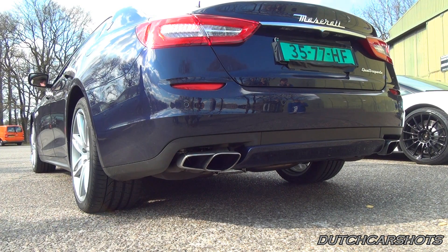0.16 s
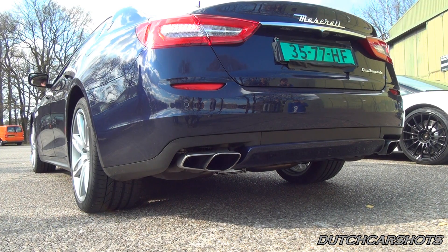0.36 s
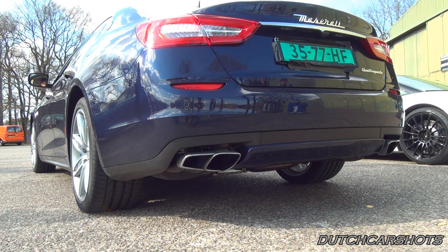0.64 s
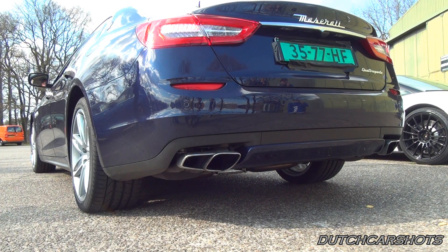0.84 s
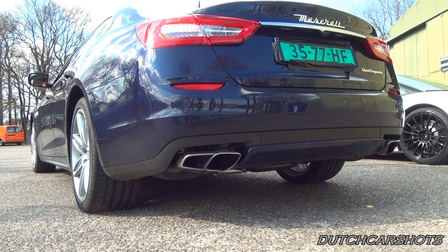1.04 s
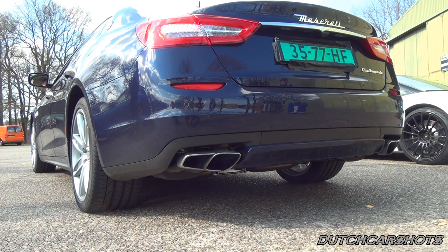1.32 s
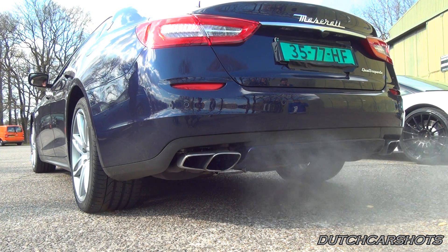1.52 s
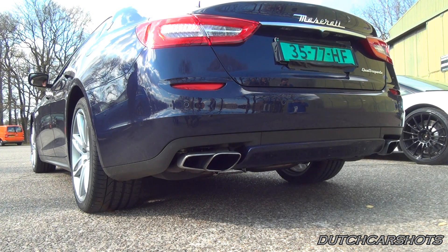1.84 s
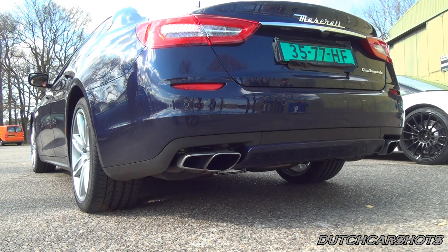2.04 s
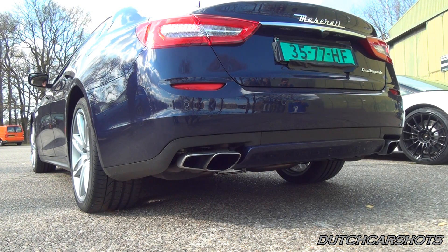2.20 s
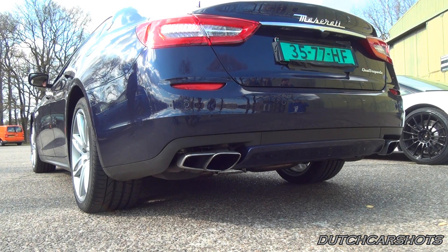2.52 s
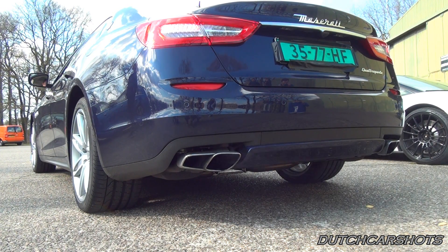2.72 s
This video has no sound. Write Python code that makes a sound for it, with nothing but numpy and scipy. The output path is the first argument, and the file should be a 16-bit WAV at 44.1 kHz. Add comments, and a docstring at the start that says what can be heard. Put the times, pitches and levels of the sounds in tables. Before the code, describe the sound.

Close, dry, nearly centred exhaust sound on an open paved lot: a hollow coasting drone drops, surges into a crackling bark, pops sharply at the peak, coasts down quieter, then snarls upward again, cut off while rising.

```python
"""Twin-turbo V8 blips on a paved lot

Microphones close behind the tailpipes of a coasting engine; it is blipped twice, the second blip still open at the end.
Uneven firings ring the exhaust; each also gives a shock, making a rasp that is loudest under load; gas and turbos hiss.
At the top of the first rev the throttle shuts and fuel pops in the pipes as bursts of noise that ring the tips.
The lot adds a faint decaying echo, and a fast limiter holds the peaks."""
import sys
import numpy as np
from scipy import signal
from scipy.fft import rfft, irfft, next_fast_len
from scipy.io import wavfile
from scipy.ndimage import uniform_filter1d

SR = 44100
rng = np.random.default_rng(int(sys.argv[2]) if len(sys.argv) > 2 else 0)


def log_audio(samples):
    """Write samples as a 16-bit WAV file to the path given in sys.argv[1]."""
    # one column per channel
    frames = np.atleast_2d(samples).T
    # limit to full scale, then quantise
    limited = np.clip(frames, -1, 1)
    pcm = np.round(limited * 32767).astype(np.int16)
    wavfile.write(sys.argv[1], SR, pcm)


N = 126126

# engine speed: time_s, firing_rate_hz
ENGINE_SPEED = [(0.0, 300.9), (0.15, 271.6), (0.45, 222.3), (0.65, 194.2), (0.92, 155.8), (1.1, 161.7),
                (1.17, 170.4), (1.3, 216.7), (1.41, 273.5), (1.58, 347.1), (1.63, 342.5), (1.78, 315),
                (1.95, 285.8), (2.1, 259.8), (2.27, 233.8), (2.42, 209.4), (2.5, 203.5), (2.6, 226.2),
                (2.7, 269), (2.86, 342.4)]
# exhaust note before its brief sags: time_s, level_db
NOTE_LEVEL = [(0, -15), (.28, -17.5), (.45, -14), (.65, -15), (.83, -18), (.9, -16.5), (1.0, -14),
              (1.04, -10), (1.3, -9), (1.57, -10.5), (1.62, -12.5), (1.68, -12.5), (1.72, -16.5),
              (1.77, -14), (1.93, -19.5), (2.0, -18.5), (2.27, -19.5), (2.33, -16), (2.44, -18),
              (2.48, -12.5), (2.86, -10)]
# rasp of the firing shocks: time_s, level_db
RASP_LEVEL = [(0, -32), (.35, -34.5), (.55, -38.5), (.87, -39), (1.0, -31), (1.15, -22), (1.33, -24),
              (1.5, -22.5), (1.57, -22.5), (1.68, -32), (1.78, -29), (1.88, -35.5), (2.2, -37),
              (2.43, -41.5), (2.48, -37), (2.65, -25), (2.86, -22.5)]
# gas hiss at the tips before its flutter: time_s, level_db
HISS_LEVEL = [(0, -31.5), (.4, -34.5), (.6, -39), (.85, -45), (1.0, -38), (1.15, -30.5), (1.55, -31),
              (1.8, -36), (2.15, -35.5), (2.4, -41), (2.55, -39.5), (2.7, -33), (2.86, -35)]
# turbo whoosh: time_s, centre_hz, level_db
TURBO_WHOOSH = [(0, 13000, -46), (.3, 10500, -50), (.65, 6900, -55), (1.03, 6400, -52), (1.3, 10500, -40.5),
                (1.45, 13000, -48), (1.8, 13000, -52), (2.15, 10200, -50), (2.5, 6800, -58),
                (2.68, 9000, -40), (2.86, 13000, -54)]
# throttle blips, timed at half opening: open_s, shut_s
THROTTLE_BLIPS = [(.93, 1.58), (2.462, 2.95)]
THROTTLE_RAMP_S = 0.11

# cylinders in firing order, relative levels:
# late_firing_intervals, coast_db, throttle_db, rasp_db
CYLINDER_FIRINGS = [(.78, -6, 0, -2), (0.97, -4, -2, -7), (0.893, -5, 1.5, -12.5), (0.768, -11, -6, -7.5),
                    (.82, -12, -3.5, -4.5), (0.804, -1.5, -0.5, -11.5), (0.86, -22.5, -2.5, -9),
                    (0.487, -8.5, -13, -5)]
# random spread from firing to firing
SCATTER_DB, JITTER_S, RASP_SCATTER_DB = 1.1, .00006, 2.2
# each cylinder's drift over a few cycles; its strength drifts half as much under throttle
DRIFT_DB, DRIFT_S = 2.0, .00011
# puffs of gas beside the pulses; the load level adds to the first under throttle
TURBULENCE_DB, LOAD_TURBULENCE_DB, PUFF_S = -10.5, -12, .002
# boom at the firing rate under throttle: firing_rate_hz, level_db
FIRING_BOOM = [(165, -25), (205, -30), (230, -17), (270, -15), (345, -45)]
COAST_DRONE_DB = -18
# share of full gas flow under throttle: firing_rate_hz, share
GAS_FLOW = [(170, 0), (260, 0.93)]
# exhaust colour, relative: frequency_hz, level_db
PIPE_COLOUR = [(30, -68), (100, -36), (150, -27.5), (230, -26), (300, -20.5), (360, -6.5), (480, -3.5),
               (560, -13), (720, -22.5), (900, -14.5), (1120, -37), (1600, -30), (3000, -69.5),
               (16000, -100)]
# exhaust resonances: pitch_hz, width_hz, low_flow_lift_db, full_flow_lift_db
PIPE_RESONANCES = [(153, 21, 9, -14), (271, 17.6, 9.5, 11), (344.7, 34.7, 11, 9), (391.7, 17, 7, 0.5),
                   (434, 37.7, 8, 10.5), (480.5, 29.7, 9, 9.5), (606, 21, 8.5, 3), (658, 34, 12, 3.5),
                   (730, 28, -1, 9), (787.3, 23.7, 11.5, 11.5), (832.8, 36, 15.5, 9), (886, 25, 2.5, 3),
                   (1013.6, 31, 13.5, 10.5)]
# wander of the resonances: spread as a share of pitch, length of each smoothing pass
WANDER_SHARE, WANDER_SMOOTH_S = .016, .09
# the note above this edge comes forward with throttle
BARK_HZ, BARK_COAST_DB, BARK_LOAD_DB = 530, 1, 8.5
# brief sags of the note: centre_s, length_s, level_db
NOTE_SAGS = [(1.013, .015, -1), (1.219, 0.012, -5.5), (1.668, 0.014, -4), (2.544, 0.015, -2.5)]

# colour of rasp and cracks, relative: frequency_hz, level_db
RASP_TONE = [(60, -72), (500, -13), (1150, -1.5), (1300, 1), (1450, 7), (1680, 3.5), (1900, 8.5),
             (2400, -0.5), (2800, -4), (3300, -9.5), (3800, -21.5), (4600, -17.5), (5600, -48),
             (15000, -50)]
# shock fronts coasting and under throttle, and steady noise under them
SHOCK_COAST_DB, SHOCK_LOAD_DB, RASP_BED_DB = -10, 0, -1.5
# sharp cracks at the tips: start_s, level_db
TIP_CRACKS = [(1.09, -6), (1.1166, -9.5), (1.14, -1.5), (1.146, -10), (1.163, -3), (1.1859, -13),
              (1.227, -12), (1.2508, -4.5), (1.3255, -11), (1.537, -1), (1.549, -9), (1.572, -7.5),
              (2.64, -10), (2.733, -7.5), (2.761, -9), (2.812, -13), (2.836, -10)]
CRACK_FRONT_DB, CRACK_TAIL_DB, CRACK_TAIL_S = 4, -8, 0.0031

# exhaust pops: start_s, level_db, decay_s, tip_ring_db
EXHAUST_POPS = [(1.608, 0.5, 0.011, -24), (1.61, -6, 0.0035, -30), (1.623, -5.5, 0.011, -25),
                (1.644, -19, 0.003, -32), (1.652, -16, 0.0056, -35), (1.688, -17, 0.0038, -34),
                (1.703, -7.5, 0.0084, 3), (1.718, -10, 0.0071, -8), (1.781, -22.5, 0.0028, -36)]
# colour of the pops, relative: frequency_hz, level_db
POP_TONE = [(40, -32), (120, -11.5), (300, -5), (700, 11), (1200, -3.5), (2000, 0), (3300, -6),
            (4600, -14.5), (6000, -14), (8500, -16), (12000, -21.5), (16000, -23)]
# resonances of the pops: pitch_hz, width_hz, lift_db
POP_RESONANCES = [(1900, 500, 3), (2560, 460, 1.5), (4480, 500, 6.5)]
# the duller rush after each burst
POP_TAIL_DB, POP_TAIL_S, POP_DULL_HZ = -9, .022, 2930
# flicker of the burning gas: depth and smoothing length
SPUTTER_DB, SPUTTER_SMOOTH_S = 4.5, .0008
# tailpipe tip resonances: pitch_hz, width_hz, level_db
TIP_RESONANCES = [(2710, 150, -21), (4600, 370, -28)]
TIP_RING_S = .032

# colour of the gas hiss, relative: frequency_hz, level_db
HISS_TONE = [(40, -4), (1000, 10.5), (3000, 0), (3800, -6.5), (4400, -0.5), (5000, 1.5), (5700, -8),
             (7000, 2), (8600, -6), (9600, -3), (12000, -12), (15500, -17)]
HISS_FLUTTER_DB, HISS_FLUTTER_S = 1.5, 0.0096
# colour of gas buffeting the microphone, relative: frequency_hz, level_db
BUFFET_TONE = [(15, -6.5), (38, -4), (55, -40), (110, 3.5), (200, 3), (400, -7), (2000, -102)]
# level at half jet, and rise from no jet to full jet
BUFFET_MID_DB, BUFFET_SPAN_DB = -48.5, 15
# low thumps as the throttle opens: centre_s, level_db, pitch_hz, spit_db
OPENING_THUMPS = [(0.917, -38, 114.6, -33), (2.476, -36.5, 93, -37)]
THUMP_S, SPIT_S = 0.015, 0.0076

# difference between left and right microphones: frequency_hz, level_db
STEREO_WIDTH = [(30, -36), (130, -38), (300, -36), (600, -27), (1200, -17.5), (2500, -22), (5000, -20),
                (10000, -26), (16000, -30)]
ECHO_DB, ECHO_DECAY_S = -24, .03
# limiter, rounding of peaks and top cut
LIMIT_DB, RELEASE_S, CLIP_DB, TOP_HZ = -1.5, 0.046, -.9, 15800


def engine(t, throttle, flow):
    """Firings and puffs ring the pipe; each firing also gives a shock, some cylinders far sharper, for the rasp."""
    turns = np.cumsum(curve(ENGINE_SPEED)) / SR  # counted in firings
    k = np.arange(int(turns[-1]))
    late, coast_db, load_db, rasp_db = np.array(CYLINDER_FIRINGS)[k % len(CYLINDER_FIRINGS)].T
    chance = rng.standard_normal((N // 100, 3))[:len(k)].T
    stronger, later = drift(len(k))
    times = np.interp(k + late, turns, t) + JITTER_S * chance[0] + DRIFT_S * later
    load = np.interp(times, t, throttle)

    firing_db = coast_db + load * (load_db - coast_db)
    firing_db = firing_db + SCATTER_DB * chance[1] + DRIFT_DB * (1 - load / 2) * stronger
    pulses = clicks(times, undb(firing_db))
    turbulence = undb(TURBULENCE_DB) + throttle * undb(LOAD_TURBULENCE_DB)
    puffs = even(fade(pulses, PUFF_S) * noise()) * turbulence
    boom_gain = undb(np.interp(curve(ENGINE_SPEED), *np.array(FIRING_BOOM).T)) * throttle
    boom = boom_gain * np.cos(2 * np.pi * (turns - late.mean()))
    slow_swing = np.cos(2 * np.pi * turns * 5 / 8)  # five swings to a cycle of eight firings
    drone = undb(COAST_DRONE_DB) * (1 - throttle) * slow_swing
    note = even(bark(pipe(even(pulses) + puffs + boom + drone, flow), throttle))

    shocks = clicks(times, undb(load * rasp_db + RASP_SCATTER_DB * chance[2]))
    shock_gain = undb(SHOCK_COAST_DB + throttle * (SHOCK_LOAD_DB - SHOCK_COAST_DB))
    spray = even(fade(shocks, PUFF_S) * noise())
    rasp = colour(shock_gain * even(shocks) + spray + undb(RASP_BED_DB) * noise(), RASP_TONE)
    return note * undb(curve(NOTE_LEVEL)) * sag(t) + even(rasp) * undb(curve(RASP_LEVEL))


def drift(count, size=4):
    """Two slow random values for each firing, shared with the same cylinder in nearby cycles."""
    draws = rng.standard_normal((N // 500, len(CYLINDER_FIRINGS), 2))
    smooth = uniform_filter1d(draws, size, axis=0) * np.sqrt(size)
    return smooth.reshape(-1, 2)[:count].T


def pipe(x, flow):
    """Uneven gas temperature makes the resonances wander together; gas flow changes their balance."""
    samples = np.arange(N)
    swing = flicker(WANDER_SMOOTH_S)
    clock = samples + np.cumsum(WANDER_SHARE * (swing - swing.mean()))
    # warp time, filter, then unwarp: the resonances move but the firings stay in place
    warped = np.interp(samples, clock, x)
    pitch, width, low_lift, full_lift = np.array(PIPE_RESONANCES).T
    low = np.interp(clock, samples, colour(warped, PIPE_COLOUR, zip(pitch, width, low_lift)))
    full = np.interp(clock, samples, colour(warped, PIPE_COLOUR, zip(pitch, width, full_lift)))
    return low + flow * (full - low)


def bark(note, throttle):
    """Loaded firings are steeper, so the upper pipe resonances come forward."""
    low = signal.sosfiltfilt(signal.butter(3, BARK_HZ, fs=SR, output="sos"), note)
    return low + (note - low) * undb(BARK_COAST_DB + throttle * (BARK_LOAD_DB - BARK_COAST_DB))


def sag(t):
    """Gain of the flat-bottomed dips where the note sags for a few firings and catches again."""
    return undb(sum(db * np.exp(-(2 * (t - at) / length) ** 4) for at, length, db in NOTE_SAGS))


def cracks(t):
    """Each crack at the tips is a shock front with a short spray of gas."""
    times, db = np.array(TIP_CRACKS).T
    spray = 0
    for at, level in TIP_CRACKS:
        spray = spray + (t >= at) * undb(level) * np.exp(-np.abs(t - at) / CRACK_TAIL_S)
    front = clicks(times, undb(db + CRACK_FRONT_DB))
    return colour(front + undb(CRACK_TAIL_DB) * spray * noise(), RASP_TONE)


def pops(t):
    """Unburnt fuel goes off: a sharp, sputtering burst and a weaker, duller rush of gas."""
    burst, rush = 0, 0
    for start, db, decay, _ in EXHAUST_POPS:
        age = np.maximum(t - start, 0)
        size = (t >= start) * undb(db)
        burst = burst + size * np.exp(-age / decay)
        rush = rush + size * undb(POP_TAIL_DB) * np.exp(-age / POP_TAIL_S)
    sputter = unit(undb(SPUTTER_DB * flicker(SPUTTER_SMOOTH_S)))
    dull = signal.sosfilt(signal.butter(2, POP_DULL_HZ, fs=SR, output="sos"), rush * noise())
    return colour((burst * noise() + dull) * sputter, POP_TONE, POP_RESONANCES)


def tips(t):
    """The steel tips ring briefly after each pop, as narrow bands of noise."""
    power = 0
    for at, _, _, db in EXHAUST_POPS:
        power = power + ((t >= at) * undb(db) * np.exp(-np.abs(t - at) / TIP_RING_S)) ** 2
    ring = 0
    for hz, width, db in TIP_RESONANCES:
        band = signal.lfilter(*signal.iirpeak(hz, hz / width, fs=SR), noise())
        ring = ring + undb(db) * unit(band)
    return np.sqrt(power) * ring


def gas(jet):
    """The jet hisses unevenly at the tips and buffets the microphone, harder under throttle."""
    flutter = unit(fade(fade(noise(), HISS_FLUTTER_S), HISS_FLUTTER_S / 2))
    hiss = colour(noise(), HISS_TONE) * undb(curve(HISS_LEVEL) + HISS_FLUTTER_DB * flutter)
    buffet_db = BUFFET_MID_DB + BUFFET_SPAN_DB * (jet - 0.5)
    return hiss + colour(noise(), BUFFET_TONE) * undb(buffet_db)


def turbo(half_width_hz=1150):
    """A band of noise that rises and falls with the turbine's speed."""
    lowpass = signal.butter(2, half_width_hz, fs=SR, output="sos")
    band = signal.sosfilt(lowpass, noise() + 1j * noise())
    carrier = np.exp(2j * np.pi * np.cumsum(curve(TURBO_WHOOSH)) / SR)
    return unit((band * carrier).real) * undb(curve(TURBO_WHOOSH, col=2))


def thumps(t):
    """A soft low push and a spit of gas from the pipes at the start of each blip."""
    push, spit = 0, 0
    for at, db, hz, spit_db in OPENING_THUMPS:
        swell = undb(db) * np.exp(-((t - at) / THUMP_S) ** 2)
        push = push + swell * np.sin(2 * np.pi * hz * (t - at))
        spit = spit + undb(spit_db) * (t >= at) * np.exp(-np.abs(t - at) / SPIT_S)
    return push + colour(spit * noise(), HISS_TONE)


def lot(car, t):
    """One decaying burst of noise, convolved with the car, stands for a diffuse reflection."""
    reflections = unit(noise() * np.exp(-t / ECHO_DECAY_S)) / np.sqrt(N)
    return signal.fftconvolve(car, reflections)[:N]


def undb(db):
    """Decibels to gain."""
    return 10 ** (np.asarray(db) / 20)


def curve(rows, col=1):
    """One column of a time table, joined by straight lines."""
    rows = np.array(rows)
    return np.interp(np.arange(N) / SR, rows[:, 0], rows[:, col])


def unit(x):
    """Scale to rms 1."""
    return x / np.sqrt(np.mean(x ** 2))


def even(x, size=3500):
    """Take out slow changes of level and keep the fast ones."""
    power = uniform_filter1d(uniform_filter1d(x ** 2, size), size)
    return x / np.sqrt(power + 1e-12)


def colour(x, points, modes=(), keep_power=True):
    """Causal minimum-phase filter from (Hz, dB) points, lifted at each resonance."""
    size = 2 * next_fast_len(N)
    hz = np.arange(size // 2 + 1) * SR / size
    points = np.array(points)
    db = np.interp(np.log(hz + 1), np.log(points[:, 0]), points[:, 1])
    for centre, width, lift in modes:
        db = db + lift / (1 + (2 * (hz - centre) / width) ** 2)
    gain = unit(undb(db)) if keep_power else undb(db)
    # folding the cepstrum makes the filter causal
    cepstrum = irfft(np.log(gain))
    cepstrum[1:size // 2] *= 2
    cepstrum[size // 2 + 1:] = 0
    return irfft(rfft(x, size) * np.exp(rfft(cepstrum)))[:N]


def clicks(times, sizes):
    """Impulses, each shared between two samples."""
    at = np.clip(times * SR, 0, N - 2)
    i = at.astype(int)
    return np.bincount(i, sizes * (1 - at + i), N) + np.bincount(i + 1, sizes * (at - i), N)


def fade(x, seconds):
    """Give every impulse an exponential tail."""
    return signal.lfilter([1], [1, -np.exp(-1 / (seconds * SR))], x)


def flicker(seconds):
    """A smooth random swing of rms 1."""
    size = max(int(seconds * SR), 1)
    smooth = uniform_filter1d(noise(), size, mode="wrap")
    return unit(uniform_filter1d(smooth, size, mode="wrap"))


def noise():
    """White noise."""
    return rng.standard_normal(N)


def scene():
    """The car, nearly in the centre, with a faint echo from the lot."""
    t = np.arange(N) / SR
    throttle = 0
    for on, off in THROTTLE_BLIPS:
        throttle = throttle + np.clip(np.minimum(t - on, off - t) / THROTTLE_RAMP_S + .5, 0, 1)
    flow = throttle * np.clip(np.interp(curve(ENGINE_SPEED), *np.array(GAS_FLOW).T), 0, 1)
    exhaust = engine(t, throttle, flow) + cracks(t) + pops(t) + tips(t)
    car = exhaust + gas((throttle + flow) / 2) + turbo() + thumps(t)
    echo = lot(car, t)
    side = colour(lot(car, t), STEREO_WIDTH, keep_power=False)
    return car + undb(ECHO_DB) * echo + side * np.array([[1], [-1]])


def record(dry):
    """A fast limiter on both microphones together, rounded peaks and a steep top cut."""
    fall = np.arange(N) / SR / RELEASE_S
    loudest = np.log(np.abs(dry).max(axis=0) + 1e-9)
    peak = np.exp(np.maximum.accumulate(loudest + fall) - fall)  # instant rise, exponential release
    held = dry * uniform_filter1d(np.minimum(1, undb(LIMIT_DB) / peak), size=90)
    rounded = held / (1 + (held / undb(CLIP_DB)) ** 8) ** (1 / 8)
    return signal.sosfilt(signal.ellip(10, .1, 80, TOP_HZ, fs=SR, output="sos"), rounded)


dry = scene()
out = record(dry)
log_audio(out)
```